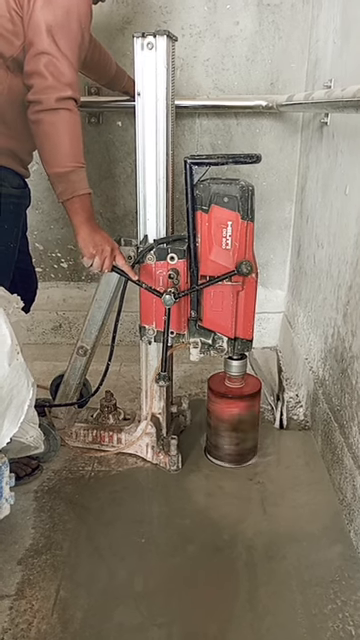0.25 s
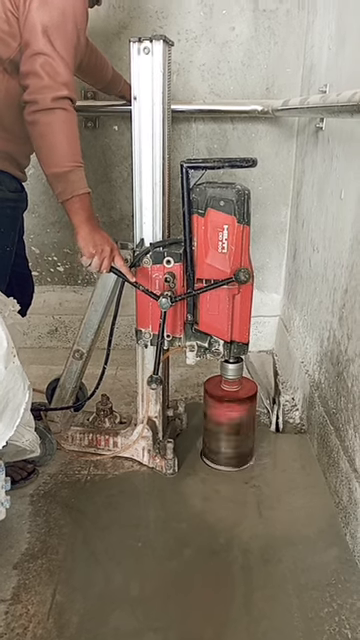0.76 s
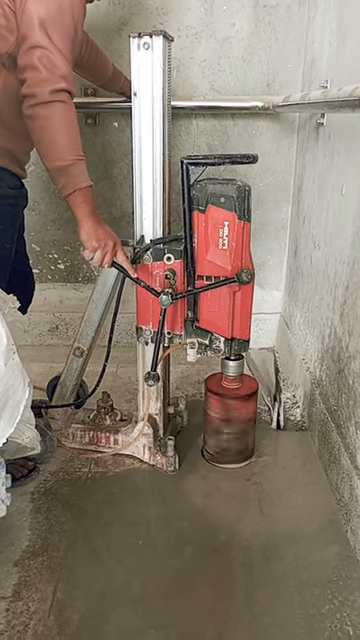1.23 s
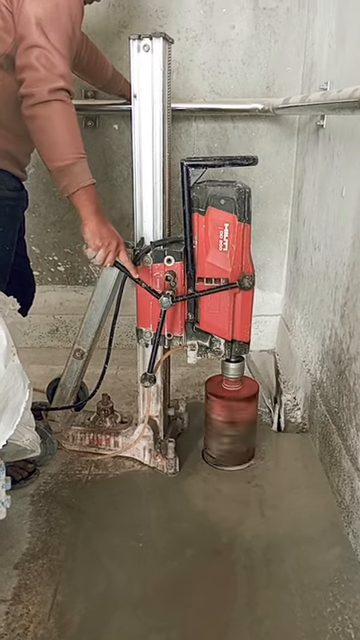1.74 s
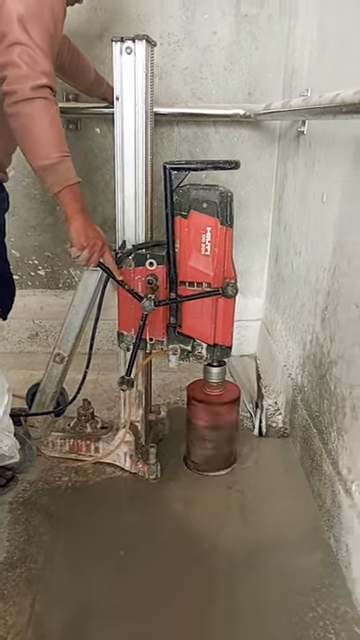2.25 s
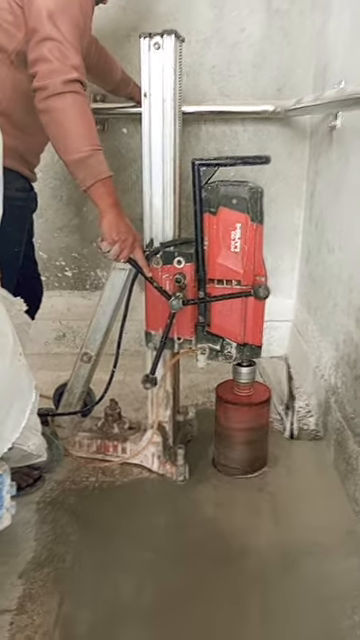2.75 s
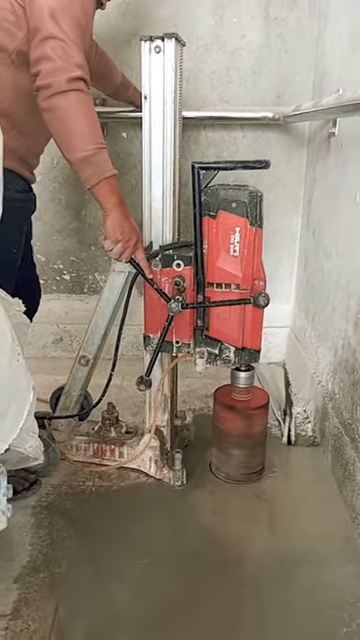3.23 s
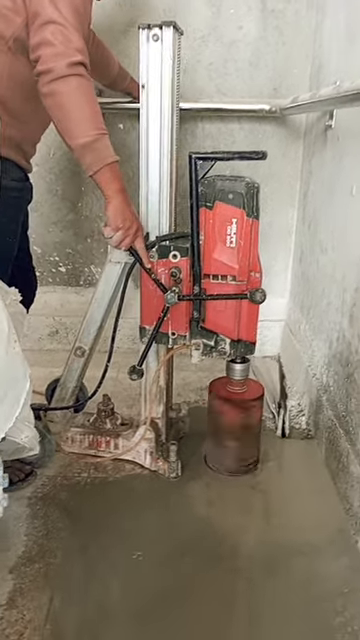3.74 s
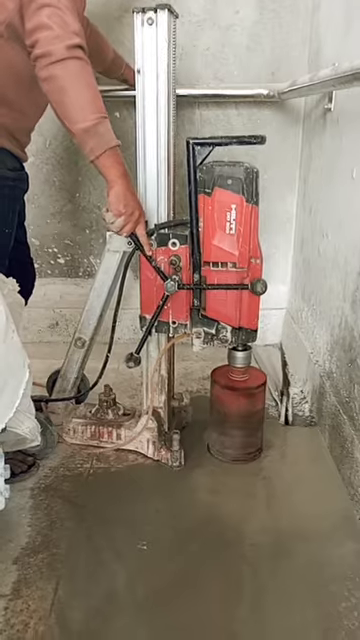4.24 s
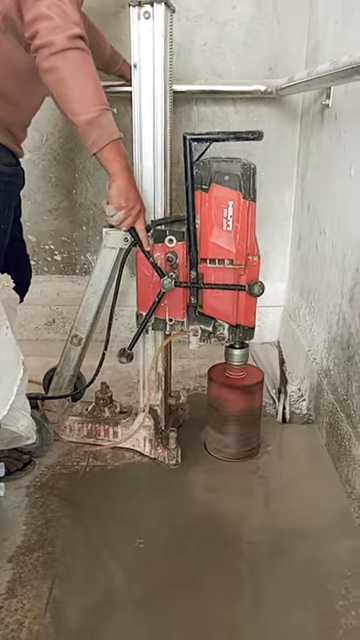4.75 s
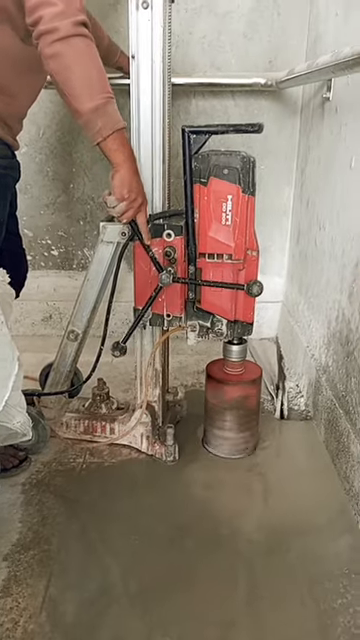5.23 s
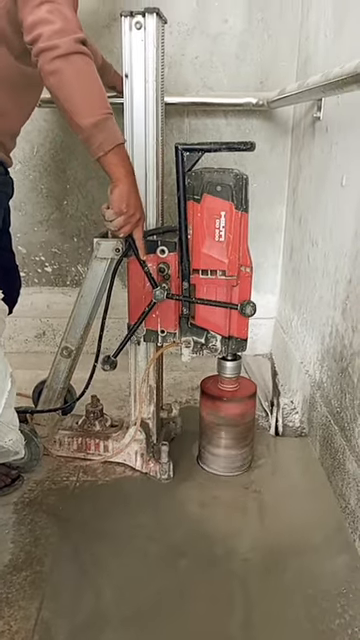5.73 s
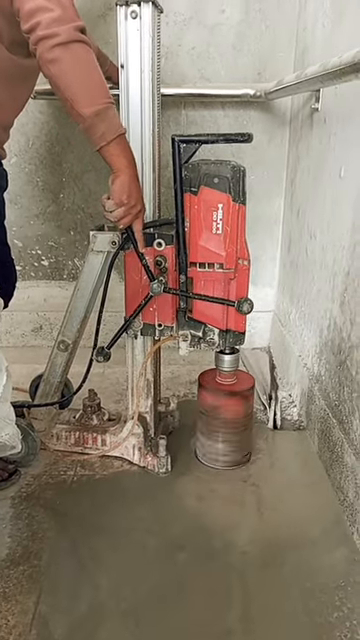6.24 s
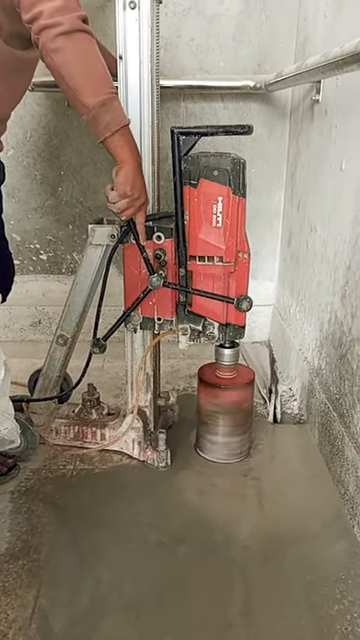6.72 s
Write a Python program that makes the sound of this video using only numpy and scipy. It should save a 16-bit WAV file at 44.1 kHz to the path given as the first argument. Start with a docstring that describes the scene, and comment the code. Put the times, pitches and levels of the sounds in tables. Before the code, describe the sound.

A drill motor runs continuously, already at full speed, with no start or stop. Its bit scrapes loosely at first, with uneven surging whine and ringing steel, then bites firmly and smooths out. Bright abrasive hiss and rushing cooling air fill the top, with short reflections from bare walls. The whistle stutters with each bit turn; soft wind thumps grow more frequent in the second half. Close, centred sound.

```python
"""Close to a core drill on a stand, cutting a wet concrete floor in a small bare room.
At first the bit is loose and chatters lightly; after about two seconds the feed firms up and it fades.
Throughout, the motor sags once per turn of the bit; gears whine, the motor whistles, the rim grinds in
hissing slurry. Gear and motor lines follow the shaft; grinding, slurry and air are shaped noise.
Later the draught of cooling air freshens, with gusts and thumps buffeting the microphone."""
import sys
import numpy as np
from scipy import signal
from scipy.fft import rfft, irfft, next_fast_len
from scipy.io import wavfile
from scipy.ndimage import uniform_filter1d, minimum_filter1d

SR = 44100
rng = np.random.default_rng(int(sys.argv[2]) if len(sys.argv) > 2 else 0)


def wav_out(sig):
    """Save sig, one row per channel (or a flat mono array), as 16-bit PCM at SR to the path in sys.argv[1]."""
    wavfile.write(sys.argv[1], SR, np.round(np.clip(np.atleast_2d(sig).T, -1, 1) * 32767).astype(np.int16))


N = 307818

PINION_TEETH, WHEEL_TEETH, SECOND_TEETH = 9, 69, 14
WHISTLE_ORDER = 30  # whistle cycles per motor turn
FIRST_BIND_S, BIT_TURN_S = .098, .2543  # the rim binds once per turn of the bit
TOP_HZ = 15750  # upper band limit
CEILING = .66  # limiter ceiling, full scale = 1

# Motor speed before the sag: (time [s], speed [turns/s])
MOTOR_SPEED = [(0, 329.8), (1.3, 330.5), (1.8, 332.2), (2.25, 332.8), (3.2, 332.0), (4.3, 332.5),
               (4.65, 333.1), (5.35, 331.7), (6.0, 334.6), (6.98, 334.7)]
# The binding spot wanders round the rim: (time [s], lateness [s])
BIND_LATENESS = [(0, .003), (.85, .015), (1.6, -.004), (3.7, -.01), (4.7, -.005), (5.9, .012), (6.98, 0)]
# Looseness of the bit in the cut: (time [s], looseness [0-1])
LOOSENESS = [(0, 1), (1.8, .95), (2.6, 0.28), (4, 0.06), (6.98, 0.08)]
# Whine of the pinion: (time [s], tooth rate [dB], 2nd harmonic [dB], 3rd harmonic [dB])
PINION_LEVELS = [(0, -30.5, -24.5, -29), (0.8, -26.5, -27.0, -23), (1.5, -30.5, -30.0, -25.5),
                 (1.75, -27, -33, -20), (2.25, -27, -26, -31), (2.7, -26.5, -18.0, -25.0),
                 (3.3, -32.0, -20.0, -23.5), (3.8, -33.0, -21.5, -20), (4.6, -34.5, -17.5, -20),
                 (5.05, -33, -19.5, -22), (5.65, -32, -21, -19.0), (6.1, -44, -20, -25),
                 (6.5, -35, -21, -22.5), (6.98, -40, -18.5, -19.5)]
# Slow swell of the motor's top whistle, before its stutter: (time [s], level [dB])
WHISTLE_SWELL = [(0, -22), (0.25, -21.5), (0.65, -30), (1.3, -25), (1.75, -33), (2.0, -17.5), (2.7, -21.5),
                 (3.7, -24), (4.0, -16.5), (4.45, -23.5), (5.0, -14.5), (5.35, -14.5), (5.55, -21),
                 (6.0, -16.5), (6.98, -21)]
# How far the whistle jumps or drops while the rim binds: (time [s], change [dB])
WHISTLE_AT_BIND_CHANGE = [(0, -4), (.85, 7.5), (2.9, 6), (3.9, -1), (6.98, -2.5)]
# Drone of rotor unbalance: (time [s], level [dB])
DRONE_LEVEL = [(0, -43.5), (2.2, -39), (3.3, -44), (5.5, -40.5), (6.1, -33), (6.98, -37)]
# Weak rotor lines, at their level for a fully loose bit: (multiple of motor speed [-], level [dB])
ROTOR_LINES = [(2, -48.5), (3, -43.5), (10, -42.5), (12, -45), (15, -39.5), (21, -52), (24, -41), (26, -43)]
# Weak lines of the second mesh, likewise: (multiple of its tooth rate [-], level [dB])
MESH_LINES = [(1, -56), (2, -45.5), (3, -40), (6, -42)]
# Noise of the cut and the fan: (time [s], grinding [dB], slurry [dB], fan air [dB])
CUT_LEVELS = [(0, -23, -21, -22), (1.8, -22.2, -19.5, -20.5), (2.5, -22.5, -21, -20.5),
              (4.8, -23, -22.8, -21), (6.98, -21, -21, -19.5)]
# Spectrum shape of the grinding rim: (frequency [Hz], relative density [dB per Hz])
GRIND_SPECTRUM = [(200, -24), (500, -11.5), (950, -1.5), (1200, -5.5), (1550, -1.5), (1950, -1), (2350, 0),
                  (2750, -1.5), (3400, -2), (3900, -2.5), (4350, -6), (4750, 1), (5600, -2.5), (6800, -5.5),
                  (10000, -26)]
# Spectrum shape of the hissing slurry: (frequency [Hz], relative density [dB per Hz])
SLURRY_SPECTRUM = [(3500, -43), (5200, -1), (6200, 4), (6700, 1.5), (7300, -1), (8100, 1), (8700, -9.5),
                   (9500, 3.5), (11000, -24), (16000, -37)]
# Spectrum shape of the fan air: (frequency [Hz], relative density [dB per Hz])
AIR_SPECTRUM = [(6000, -59), (8400, -5), (9300, -1.5), (9700, -2.5), (10400, -5), (11000, -8.5),
                (11400, -9.5), (12000, -15), (12700, -20.5), (13500, -20.5), (14500, -24), (16000, -26)]
# Ringing of the steel barrel and stand: (frequency [Hz], width [Hz], relative level [dB])
BARREL_MODES = [(958, 27, 7), (1194, 22, 10), (1813, 40, 4.5), (3350, 120, 8.5), (3870, 580, 5.5),
                (4900, 960, 3.5), (6200, 170, -4)]
# Decay of the bare room: (frequency [Hz], time to fall 60 dB [s])
ROOM_DECAY = [(100, 0.18), (2000, 0.39), (12000, 0.39)]
# The draught slowly freshens: (time [s], large eddies [dB], small eddies [dB])
BREEZE_LEVELS = [(0, -37.5, -39), (3.6, -35.5, -38), (4.6, -34, -33.5), (6.98, -30.5, -32.5)]
# Gusts: (centre [s], length [s], lift of the large eddies [dB], lift of the small eddies [dB])
GUST_LIFTS = [(2.85, 0.12, 2, 4.5), (3.817, 0.064, 8.5, 3.5), (4.044, 0.17, 7, 9), (4.6, 0.14, -4, 5.5),
              (4.777, .12, 9, 1.5), (5.046, 0.17, 2, 10.5), (5.326, 0.15, 5, 12), (6.07, 0.15, -2, 7.5),
              (6.383, .12, 1, 1)]
# Spectrum shape of the large eddies: (frequency [Hz], relative density [dB per Hz])
LARGE_EDDY_SPECTRUM = [(20, -24), (40, -21), (58, -10), (75, -0.5), (120, 1.5), (200, -0.5), (300, -11),
                       (500, -15.5), (1500, -50)]
# Spectrum shape of the small eddies: (frequency [Hz], relative density [dB per Hz])
SMALL_EDDY_SPECTRUM = [(100, -23), (250, 1), (420, 0), (700, -3), (1100, -10), (1500, -5.5), (2500, -48)]
# Single eddies that thump the microphone: (time [s], peak before a common trim [dB])
THUMPS = [(0.531, -9.5), (2.79, -14), (2.885, -10), (4.036, -11), (4.569, -6), (4.643, -7), (5.07, -16),
          (5.096, -15), (5.823, -5.5), (6.003, -13), (6.079, -7), (6.336, -9), (6.914, -9)]


def each_turn(delay_s, width_s):
    """One short hump, 0-1, per turn of the bit, delay_s after the rim binds."""
    late_s, = curves(BIND_LATENESS)
    since_bind_s = np.arange(N) / SR - FIRST_BIND_S - late_s - delay_s
    bit_turns = since_bind_s / BIT_TURN_S
    from_nearest_s = (bit_turns - np.round(bit_turns)) * BIT_TURN_S
    return np.exp(-(from_nearest_s / width_s) ** 2)


def binding(width_s=.033):
    """Extra drag on the bit, 0-1: one short hump per turn."""
    return each_turn(0, width_s)


def shaft(drag, sag_hz=1.8):
    """Turns made by the motor, which slows under drag by up to sag_hz turns per second."""
    speed, = curves(MOTOR_SPEED)
    return np.cumsum(speed - sag_hz * drag) / SR


def pinion(turns, slack, drag, upper_db=-1.0, lower_db=-9, unload_db=-6.0):
    """The pinion's tooth rate and harmonics; the eccentric wheel adds side tones to the harmonics."""
    first_db, double_db, triple_db = curves(PINION_LEVELS)
    teeth = PINION_TEETH * turns
    wheel = teeth / WHEEL_TEETH
    # a loose bit that binds lifts the teeth out of firm contact
    first = amp(first_db + unload_db * slack * drag) * tone(teeth, flutter=.15, rough=.08)

    above = amp(upper_db) * tone(2 * teeth + wheel, flutter=0.83, rough=0.25)
    below = amp(lower_db) * tone(2 * teeth - wheel, flutter=0.68, rough=0.41)
    double = unit(tone(2 * teeth, flutter=0.41, rough=0.16) + above + below)

    triple = tone(3 * teeth, flutter=.4, rough=.28)
    triple += amp(-11) * tone(3 * teeth + wheel, flutter=0.66, rough=0.19)
    return first + amp(double_db) * double + amp(triple_db) * unit(triple)


def second_mesh(turns, slack, firm_db=-26.5, loose_db=-10, surge_db=10, dip_db=-4, uneven_db=2):
    """The slower mesh sings on its 4th harmonic, dipping each turn; a loose bit makes it surge unevenly."""
    teeth = turns * PINION_TEETH / WHEEL_TEETH * SECOND_TEETH
    surge = each_turn(delay_s=-0.043, width_s=0.035)
    dip = each_turn(delay_s=0.045, width_s=0.017)
    looseness_db = loose_db + surge_db * surge + uneven_db * wobble(7.7)
    level_db = firm_db + slack * looseness_db + dip_db * dip
    return amp(level_db) * tone(4 * teeth, flutter=0.34, rough=0.26, flutter_hz=32)


def whistle(turns, dip_db=-8, lead_dip_db=-4, waver_db=2):
    """The motor's top line stutters with every turn of the bit: it dips just before and after the bind."""
    level_db, = curves(WHISTLE_SWELL)
    bind_db, = curves(WHISTLE_AT_BIND_CHANGE)
    before = each_turn(delay_s=-.05, width_s=.012)
    during = each_turn(delay_s=0, width_s=.02)
    after = each_turn(delay_s=.034, width_s=.018)
    stutter_db = lead_dip_db * before + bind_db * during + dip_db * after
    line = tone(WHISTLE_ORDER * turns, flutter=.2, rough=.18)
    return amp(level_db + stutter_db + waver_db * wobble(10)) * line


def hum(turns, slack, waver_db=2, loose_db=2):
    """Rotor drone, plus weak wavering rotor and second-mesh lines that are stronger while the bit is loose."""
    drone_db, = curves(DRONE_LEVEL)
    drone = amp(drone_db) * tone(turns, flutter=.7, rough=.15)

    mesh_turns = turns * PINION_TEETH / WHEEL_TEETH * SECOND_TEETH
    lines = [(order * turns, db) for order, db in ROTOR_LINES]
    lines += [(order * mesh_turns, db) for order, db in MESH_LINES]
    weak = np.zeros(N)
    for cycles, db in lines:
        wave = np.sin(2 * np.pi * (cycles + rng.random()))
        weak += amp(db) * unit(amp(waver_db * wobble(14)) * wave)
    return drone + amp(loose_db * (slack - 1.0)) * weak


def cutting(drag):
    """Diamonds grind, slurry hisses round the rim and cooling air rushes out of the motor."""
    grind_db, slurry_db, air_db = curves(CUT_LEVELS)
    grind = patchy(grit(GRIND_SPECTRUM, spiky_db=-0.06, grain_hz=300), depth_db=2.0)
    slurry = patchy(grit(SLURRY_SPECTRUM, spiky_db=0.2, grain_hz=150), depth_db=1.5)
    air = grit(AIR_SPECTRUM, spiky_db=0.85, grain_hz=100)
    grind = amp(grind_db + 0.13 * drag) * grind
    slurry = amp(slurry_db + 0.73 * wobble(27)) * slurry
    air = amp(air_db + 0.23 * wobble(13)) * air
    return grind + slurry + air


def patchy(x, depth_db):
    """Uneven colour: random brief patches of time and frequency make a noise stronger or weaker."""
    z = signal.stft(x, nperseg=512)[2]
    field = uniform_filter1d(rng.standard_normal(z.shape), size=3, axis=0)  # across frequency
    field = uniform_filter1d(field, size=9, axis=1)  # along time
    return unit(signal.istft(z * amp(depth_db * unit(field)), nperseg=512)[1][:N])


def chatter(slack, level_db=-28):
    """A loose rim scrapes the barrel's resonances into ringing."""
    def body(hz):
        response = 0
        for k, (centre, width, db) in enumerate(BARREL_MODES):
            damping = 1j * hz * width
            mode = damping / (centre ** 2 - hz ** 2 + damping)
            response = response + (-1) ** k * amp(db) * mode  # neighbours in opposite phase
        return response

    scraping = rng.standard_normal(N) * amp(1.9 * wobble(25))
    return amp(level_db) * slack * unit(filtered(scraping, body))


def room(x):
    """Bare walls answer with a noise tail; the bass dies first."""
    hz, t, z = signal.stft(rng.standard_normal(SR // 2), SR, nperseg=256)
    decay = amp(-60 * t / along(ROOM_DECAY, hz)[:, None])
    tail = signal.istft(z * decay, SR, nperseg=256)[1]
    return signal.fftconvolve(x, tail / np.linalg.norm(tail))[:N]


def draught():
    """Eddies of moving air make a lumpy rumble on the microphone; each gust swells and dies away."""
    large_db, small_db = curves(BREEZE_LEVELS)
    t = np.arange(N) / SR
    for centre, length, large_lift_db, small_lift_db in GUST_LIFTS:
        swell = np.exp(-(2 * (t - centre) / length) ** 2)
        large_db = large_db + large_lift_db * swell
        small_db = small_db + small_lift_db * swell
    large = amp(large_db) * grit(LARGE_EDDY_SPECTRUM, spiky_db=4.0, grain_hz=45)
    small = amp(small_db) * grit(SMALL_EDDY_SPECTRUM, spiky_db=4.2, grain_hz=90)
    return large + small


def puffs(soft_hz=560, low_cut_hz=90, trim_db=-1):
    """Each strong eddy is one rounded pressure pulse that swings back through the microphone's low cut."""
    def shape(hz):
        s = 1j * hz
        low_cut = s ** 2 / (s ** 2 + s * low_cut_hz + low_cut_hz ** 2)
        return low_cut / (1 + s / soft_hz) ** 2

    pulse = filtered(np.ones(1), shape)[:SR // 10]
    pushes = np.zeros(N)
    for time_s, db in THUMPS:
        pushes[round(time_s * SR)] = amp(db + trim_db) * rng.choice([-1, 1])  # push or pull
    return signal.fftconvolve(pushes, pulse / np.abs(pulse).max())[:N]


def tone(turns, flutter, rough, flutter_hz=12, rough_hz=190):
    """A line of rms 1 with slow flutter and a rough skirt, both in level and in phase."""
    along_wave = 1 + flutter * wobble(flutter_hz) + rough * wobble(rough_hz)
    across_wave = flutter * wobble(flutter_hz) + rough * wobble(rough_hz)
    angle = 2 * np.pi * (turns + rng.random())
    return unit(along_wave * np.cos(angle) + across_wave * np.sin(angle))


def grit(spectrum, spiky_db, grain_hz):
    """Noise that comes in random clumps, rms 1."""
    return coloured(rng.standard_normal(N) * amp(spiky_db * wobble(grain_hz)), spectrum)


def wobble(width_hz, size=16):
    """A random curve of rms 1 whose motion falls off above width_hz, drawn every size samples."""
    knots = np.arange(0, N + size, size)
    count = next_fast_len(len(knots))
    hz = np.fft.rfftfreq(count, size / SR)
    slow = irfft(rfft(rng.standard_normal(count)) / (1 + (hz / width_hz) ** 2), count)
    return unit(np.interp(np.arange(N), knots, slow[:len(knots)]))


def coloured(x, spectrum):
    """x through a spectrum, at rms 1."""
    return unit(filtered(x, lambda hz: amp(along(spectrum, hz))))


def filtered(x, response):
    """x times a response of frequency."""
    size = next_fast_len(N + SR // 2)
    return irfft(rfft(x, size) * response(np.fft.rfftfreq(size, 1 / SR)), size)[:N]


def curves(rows):
    """One value per sample for each column after the time."""
    s, *cols = np.transpose(rows)
    return [np.interp(np.arange(N) / SR, s, c) for c in cols]


def along(points, hz):
    """(frequency [Hz], value) points read on a log frequency axis."""
    f, v = np.transpose(points)
    return np.interp(np.log(hz + 1), np.log(f + 1), v)


def amp(db):
    """Decibels to gain."""
    return 10 ** (np.asarray(db) / 20)


def unit(x):
    """Scaled to rms 1."""
    return x / np.sqrt(np.mean(np.abs(x) ** 2) + 1e-20)


def limiter(x, size=70):
    """A fast look-ahead limiter, size samples wide, holds the peaks under a ceiling."""
    needed = np.minimum(1, CEILING / (np.abs(x).max(axis=0) + 1e-9))
    return x * uniform_filter1d(minimum_filter1d(needed, size), size)


def scene():
    """The near machine, the cut with its room sound and the draught, alike in both channels."""
    drag = binding()
    turns = shaft(drag)
    slack, = curves(LOOSENESS)
    machine = pinion(turns, slack, drag) + second_mesh(turns, slack) + whistle(turns) + hum(turns, slack)
    cut = cutting(drag) + chatter(slack)
    wind = draught() + puffs()
    mono = machine + cut + amp(-11.5) * room(cut) + wind
    return np.array([mono, mono])


def record(dry, top=0.57, hardness=6):
    """Peaks are limited, crests are rounded towards top, and nothing is kept above the band limit."""
    held = limiter(dry)
    rounded = held / (1 + np.abs(held / top) ** hardness) ** (1 / hardness)
    return np.array([filtered(channel, lambda hz: hz < TOP_HZ) for channel in rounded])


dry = scene()
out = record(dry)
wav_out(out)
```